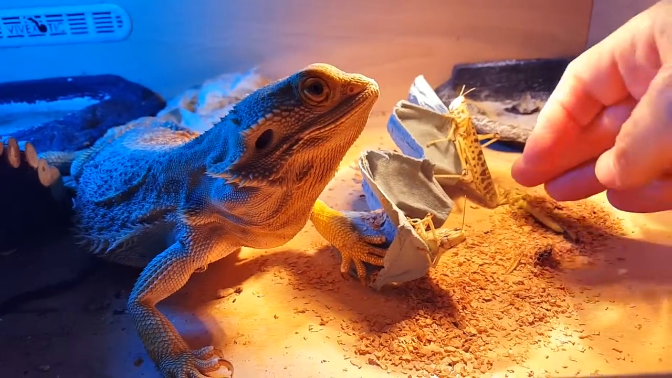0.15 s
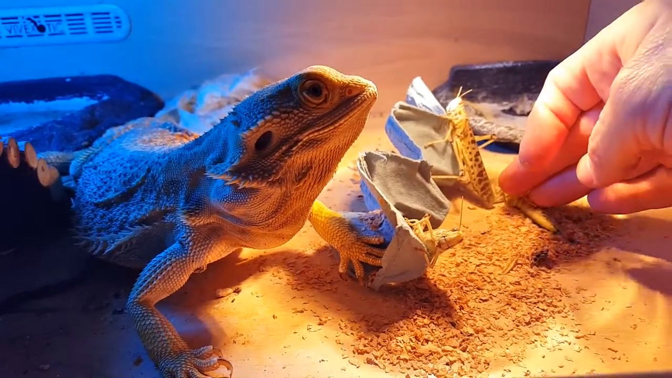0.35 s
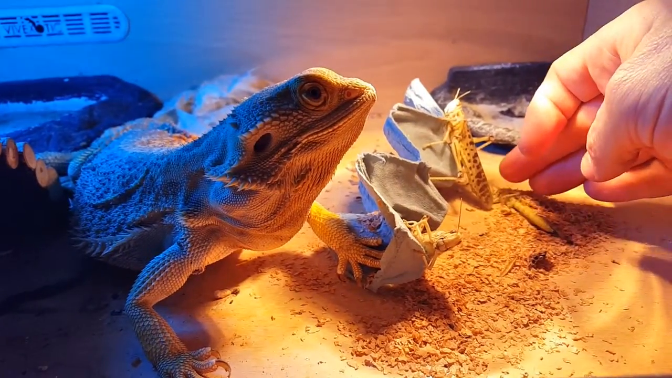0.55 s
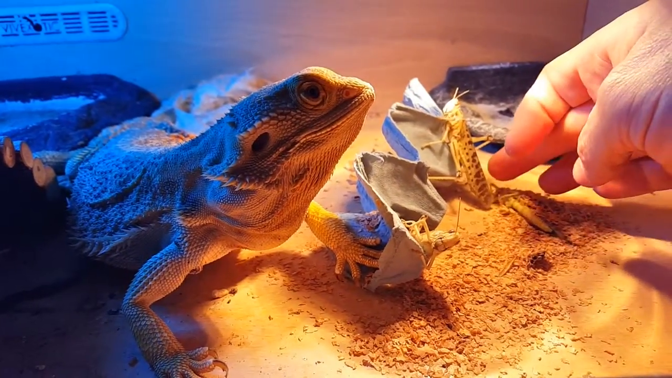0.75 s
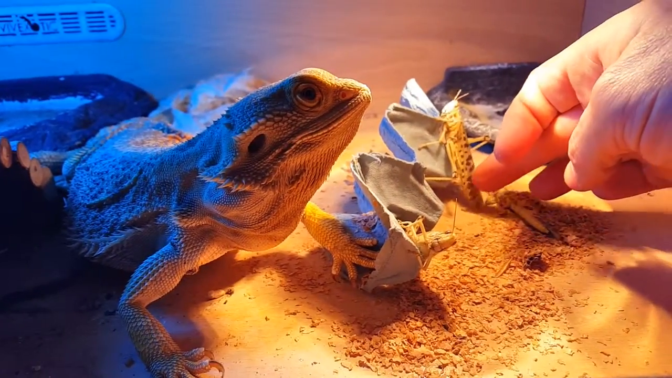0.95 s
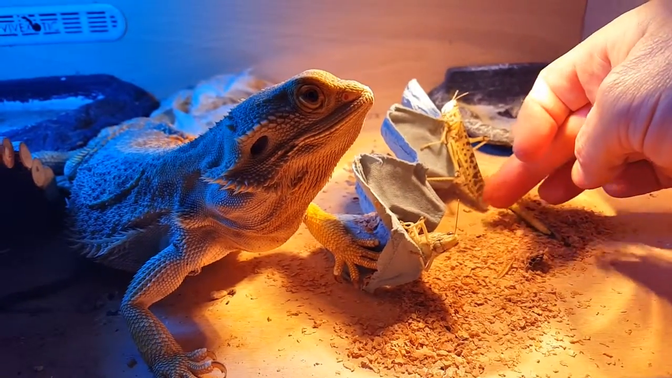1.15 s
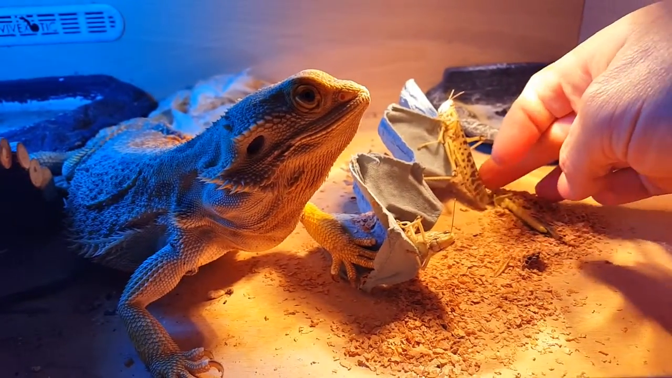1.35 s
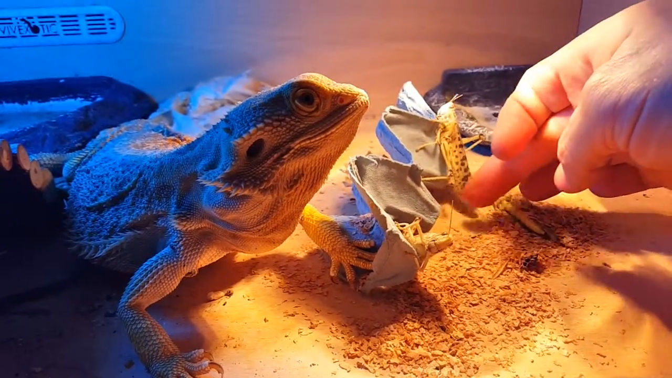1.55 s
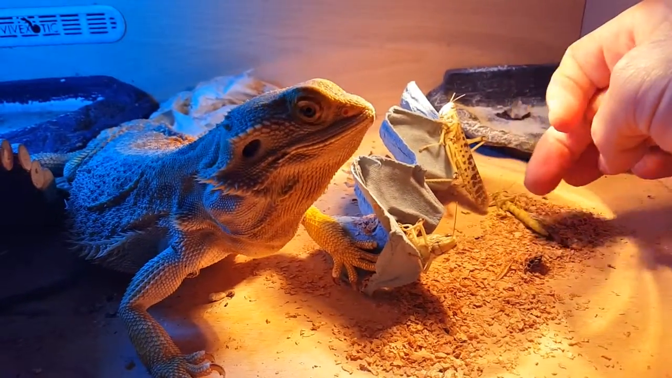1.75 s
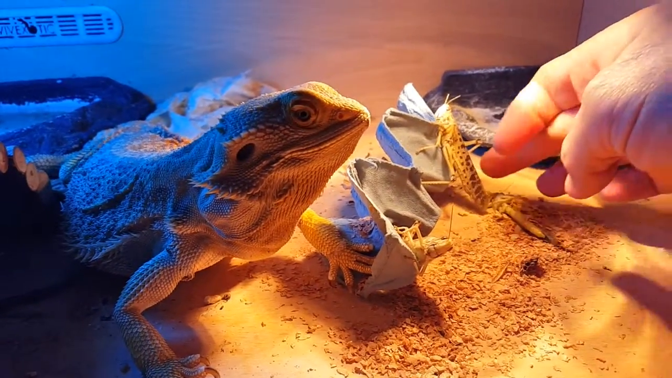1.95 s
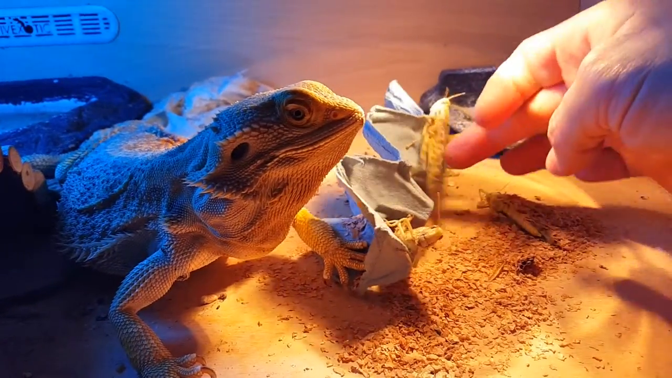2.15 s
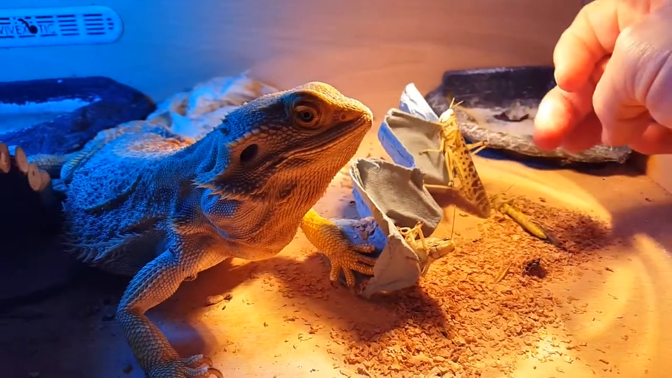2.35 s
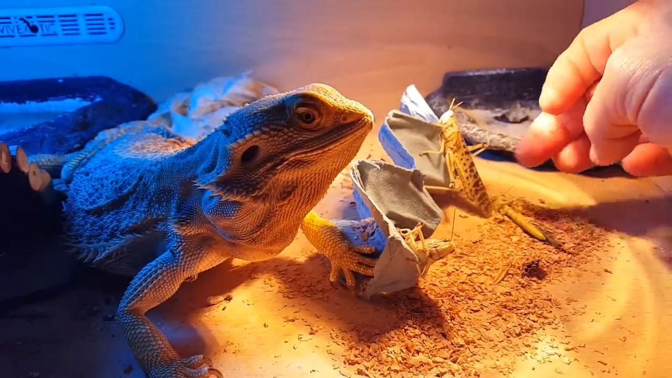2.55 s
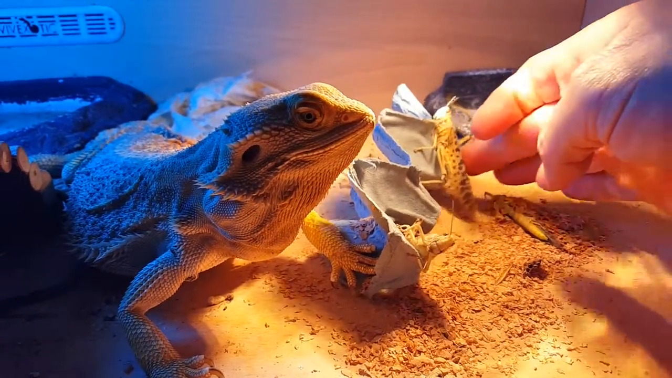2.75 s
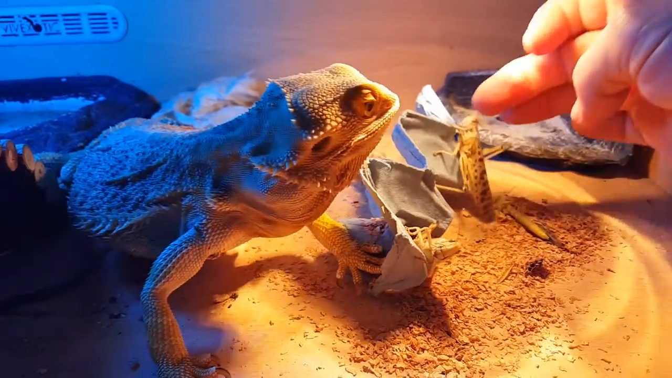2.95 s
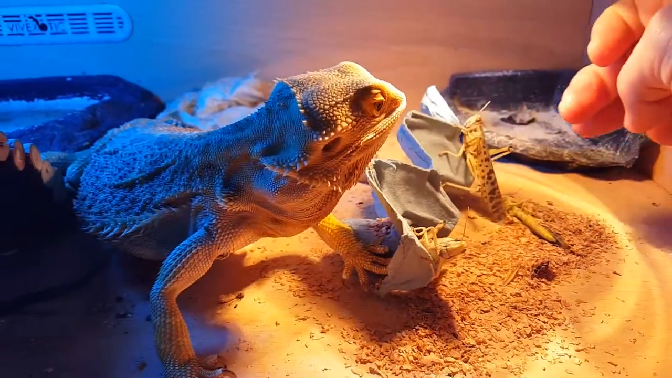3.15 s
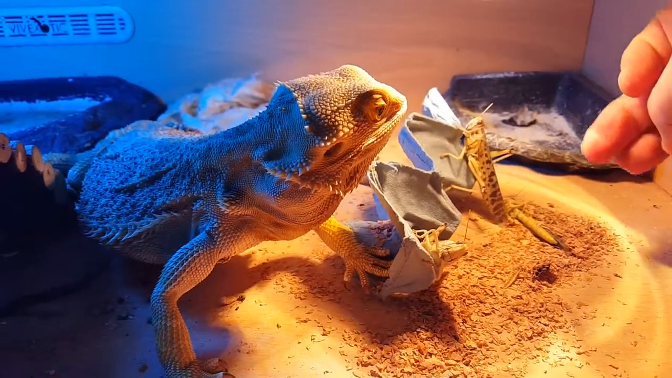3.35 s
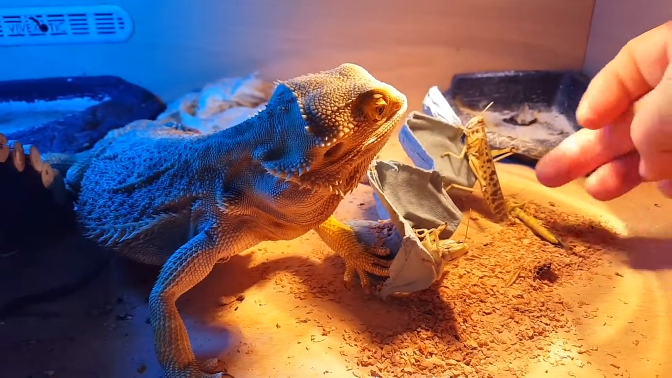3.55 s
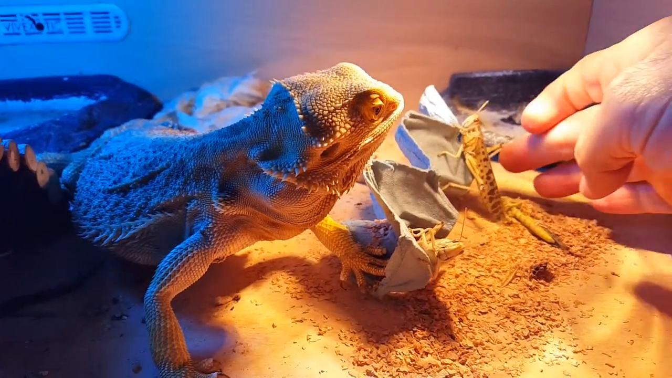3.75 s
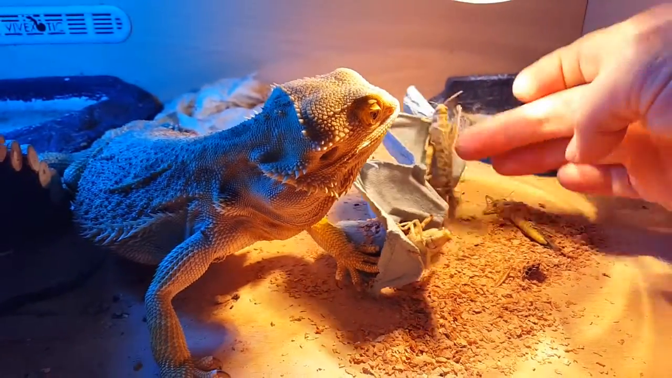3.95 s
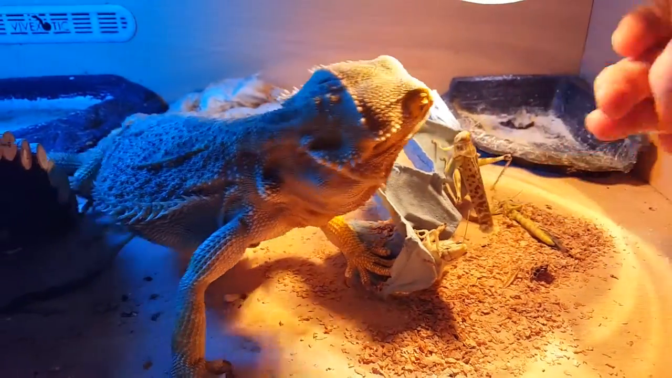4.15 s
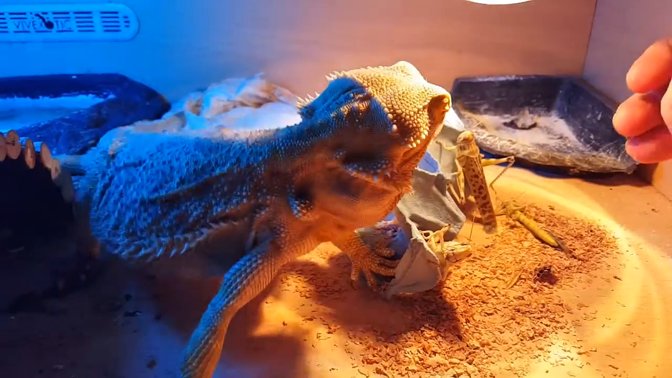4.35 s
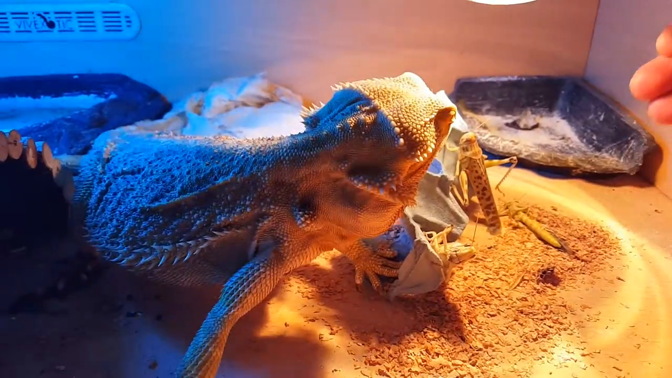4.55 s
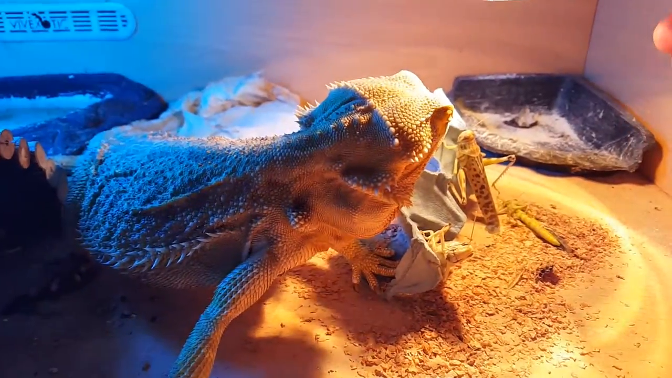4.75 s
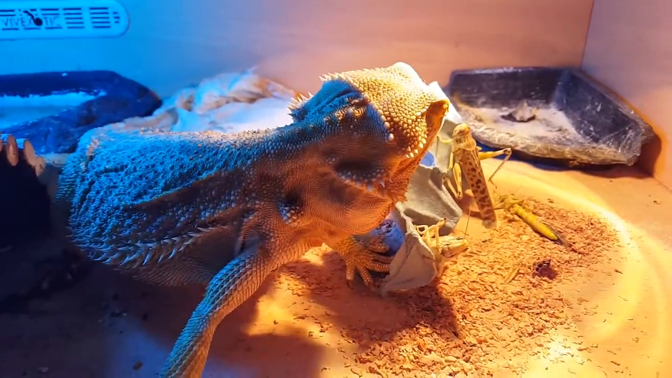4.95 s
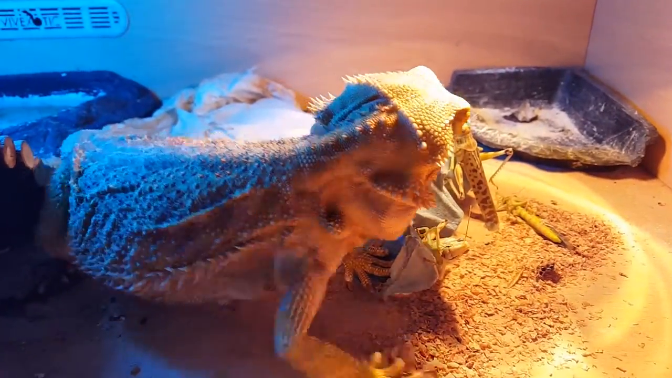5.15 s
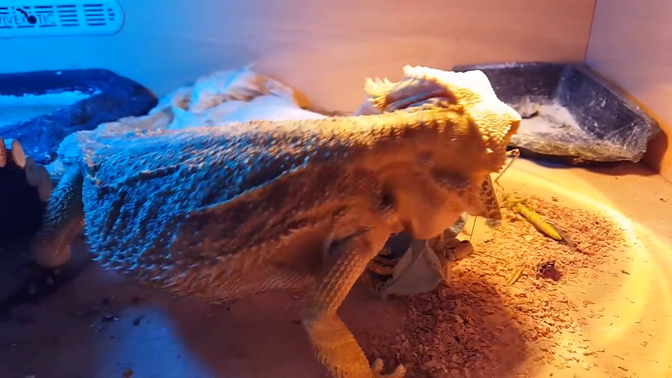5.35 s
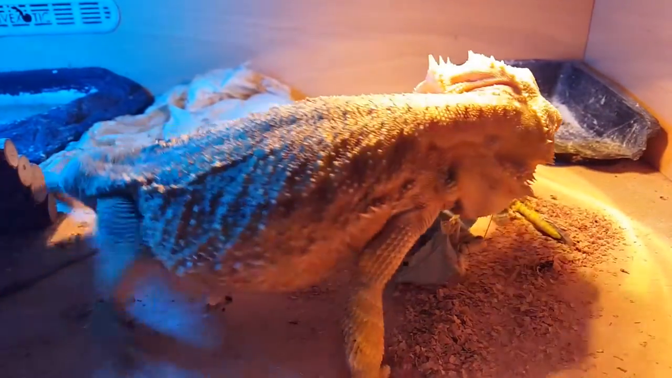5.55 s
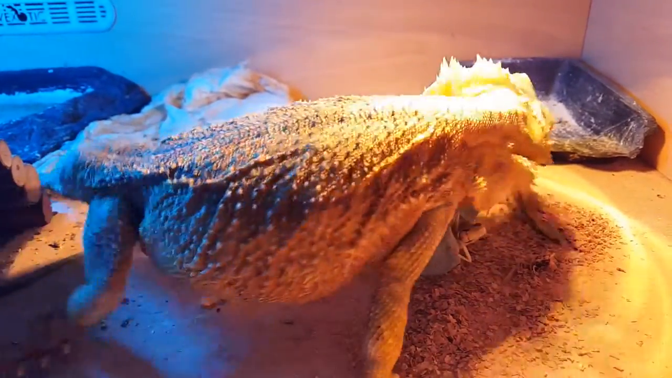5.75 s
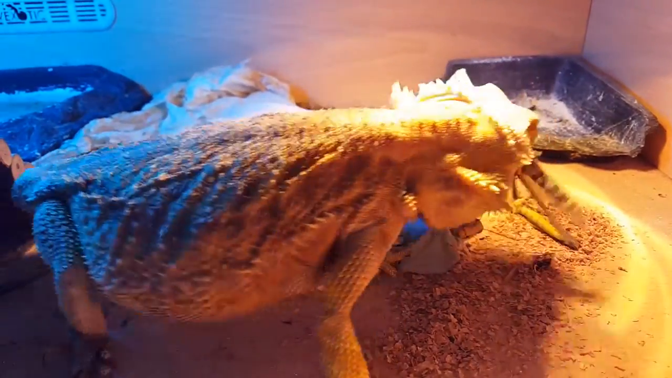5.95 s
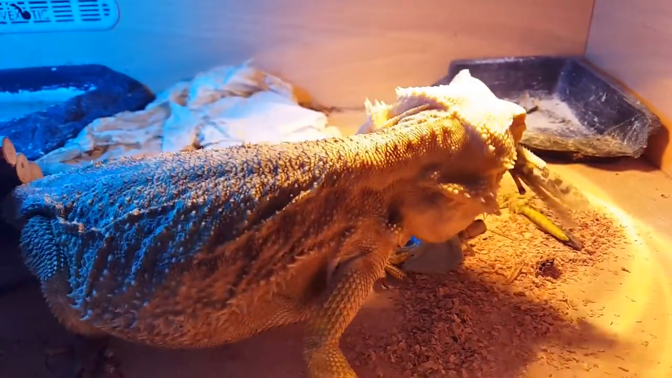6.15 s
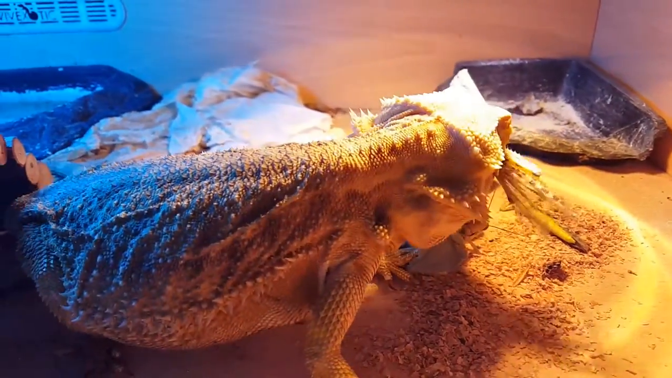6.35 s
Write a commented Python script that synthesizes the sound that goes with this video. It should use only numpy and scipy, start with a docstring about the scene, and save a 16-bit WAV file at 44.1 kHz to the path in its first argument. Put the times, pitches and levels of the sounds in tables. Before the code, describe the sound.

Woody knocks on a small enclosure, faint papery leaf rustles, a sharp snap, then a lizard scrabbles forward and crunches a brittle insect.

```python
"""A low hum, soft rubbing and a rumbling floor are heard first; from 0.4 s knocks excite a wooden vivarium.
Fingers nudge a locust over dry leaves (grains that ring); the bearded lizard then scrabbles and crunches it.
Snaps are runs of tiny touches, feet excite the modes of the hollow floor, and rubbing is filtered noise.
Decaying noise gives wall echoes and the room's tail; still air and a wavering hum lie underneath."""
import sys
import numpy as np
from scipy import signal
from scipy.fft import rfft, irfft, next_fast_len
from scipy.io import wavfile
from scipy.ndimage import uniform_filter1d

SR = 44100
rng = np.random.default_rng(int(sys.argv[2]) if len(sys.argv) > 2 else 0)


def transcribe(u):
    """Save the signal u as a 16-bit wav file named by the first command-line argument.

    u: samples, shape (n,) or (channels, n), limited to [-1, 1]; the rate is SR.
    q: integer samples, one column per channel.
    """
    v = np.clip(np.atleast_2d(u).T, -1, 1)
    q = np.round(v * 32767).astype(np.int16)
    wavfile.write(sys.argv[1], SR, q)


N = 282240
TIME = np.arange(N) / SR
GRAZE_S = .005  # surfaces graze each other this long before the main touch


# Knocks on the enclosure and, from 2.9 s, knocks of the lizard's feet:
# (time [s], relative level [dB], relative treble [dB],
# left over right [dB], ring frequency [Hz], ring energy over knock [dB])
KNOCKS = [(0.4035, -19, -23.5, 10, 870, -7), (0.4111, -13, -25, 9, 2260, -6),
          (0.473, -23.5, -30.5, 8, 1980, -10), (0.553, -14.5, -28, 5, 1300, -6),
          (0.5568, -16.5, -38, 10.5, 1930, -6), (0.6468, -7, -11.5, 10.5, 1340, -6),
          (0.656, -13, -10, -1.5, 1923, -4), (0.722, -23, -14, 5, 345, -5), (0.7419, -27.5, -15, 7, 368, 0),
          (0.8504, -26, -25.5, 6.5, 1340, -1), (2.9568, -25.5, -36, 13, 1340, 6),
          (5.0661, -16.5, -3.5, 4, 835, 12), (5.085, -23, -43, 6, 560, 15),
          (5.3352, -24, -14, 6.5, 790, -0.5)]
# Spectrum of a knock: (frequency [Hz], relative level per Hz [dB])
KNOCK_COLOUR = [(80, -30.5), (250, 0.5), (600, -3), (900, -0.5), (1400, -4.5), (2300, 5), (3400, -1.5),
                (4800, -16.5), (8000, -17), (11000, -28), (16000, -39)]


def knocks(level_db=11, treble_db=24, ring_width_hz=200):
    """Impact excitation: each knock adds a short damped resonance and wakes the room."""
    out = np.zeros((2, N))
    for s, db, bright_db, pan_db, ring_hz, ring_db in KNOCKS:
        touch = contact(.012, rattle_db=-8)
        bright = brighten(touch, bright_db + treble_db, low_hz=2900, high_hz=4630)
        knock = ringing(colour(bright, KNOCK_COLOUR), ring_hz, ring_width_hz, ring_db)
        heard = vivarium(knock, echo_db=2, echo_t60=0.047, room_db=-7.5, room_t60=0.35)
        add(out, s - GRAZE_S, from_db(db + level_db) * pan(pan_db) * heard)
    return out


# Bites in short strokes: (time [s], length [s], relative level [dB])
BITES = [(5.77, 0.015, -35.5), (5.803, 0.015, -42), (5.843, 0.03, -33.5), (5.945, 0.043, -38),
         (6.036, 0.02, -45), (6.112, 0.023, -45), (6.193, 0.018, -47.5)]
BITE_ATTACK_S, BITE_RELEASE_S = 0.0032, 0.19
# Spectrum of crunch and rasp: (frequency [Hz], relative level per Hz [dB])
CRUNCH_COLOUR = [(100, -16), (300, -24.5), (600, -10), (1100, -11.5), (1750, -7.5), (2200, -4), (3200, -7),
                 (4300, -13), (6000, -11), (7500, -17.5), (12000, -17), (16000, -28)]


def crunch(biting, level_db=-1, shell_hz=2700):
    """Brittle fracture: jaws crush the shell into sparse, coarse, uneven grains."""
    grains = crackle(biting, CRUNCH_COLOUR, shell_hz, grains_per_s=700,
                     spread_db=4.5, clump_db=1.5, pan_db=4.5)
    return from_db(level_db) * grains


# Snaps of dry leaf, grit and insect shell:
# (time [s], relative level [dB], relative treble [dB], ring frequency [Hz])
SNAPS = [(1.0088, -33.5, -35, 2770), (1.0268, -37.5, -27, 1700), (1.5291, -30, -18, 1580),
         (1.603, -37, -3, 1600), (2.2171, -26, -22, 2900), (2.852, -26, -21, 3130),
         (2.891, -26.5, -17, 2820), (2.943, -26, -13, 1310), (2.9633, -21, -17, 1340),
         (3.071, -27.5, -35, 1600), (3.989, -27, -21, 3000), (4.0085, -27.5, -2, 4400),
         (4.064, -32, -29, 3000), (4.2148, -35, -15, 7100), (4.297, -35.5, 10, 7300),
         (4.367, -14.5, -5.5, 3350), (5.0348, -25, 4, 1970), (5.1562, -26.5, -21, 3150),
         (5.54, -13, 10, 3460), (5.623, -13, 6, 2600), (5.7173, -17, -20, 2100), (5.723, -11.5, -20, 2600),
         (5.7809, -14, -31, 2090), (5.8172, -14.5, -29, 2270), (5.8419, -9.5, -12.5, 2090),
         (5.868, -15.5, -20, 2100), (5.9182, -19, -20, 3000), (5.9461, -14, -14.5, 2060),
         (5.965, -17, -18, 2950), (5.992, -17.5, -22, 2040), (6.118, -23, -17, 1720), (6.242, -27, 4, 9960),
         (6.332, -31.5, -1, 4430)]
# Spectrum of a snap: (frequency [Hz], relative level per Hz [dB])
SNAP_COLOUR = [(100, -32), (300, -15.5), (800, -8.5), (1200, -12.5), (1600, -7), (2400, -5.5), (3500, -8),
               (5000, -11), (8000, -16.5), (16000, -21.5)]


def snaps(level_db=9.5, treble_db=11, ring_width_hz=550, ring_db=-3):
    """Brittle failure: a quick run of cracks rings each piece briefly at its own pitch."""
    out = np.zeros((2, N))
    for s, db, bright_db, ring_hz in SNAPS:
        run = contact(.012, rattle_db=-2)
        bright = brighten(run, bright_db + treble_db)
        crack = ringing(colour(bright, SNAP_COLOUR), ring_hz, ring_width_hz, ring_db)
        heard = vivarium(crack, echo_db=2, echo_t60=0.038, room_db=-7, room_t60=0.28)
        add(out, s - GRAZE_S, from_db(db + level_db) * heard)
    return pan(6.6) * out


# The lizard scrabbles forward:
# (time [s], length [s], relative level [dB], ring frequency of the bedding [Hz])
SCRABBLES = [(5.2, 0.26, -50.5, 2900), (5.452, 0.065, -35.5, 2160), (5.523, 0.03, -33, 2460),
             (5.565, 0.17, -31.5, 2180)]
SCRABBLE_ATTACK_S, SCRABBLE_RELEASE_S = 0.0054, 0.14


def rasp(scrabbling, level_db=-1.47):
    """Granular friction: claws drag through the bedding in dense, fine grains."""
    grains = crackle(scrabbling, CRUNCH_COLOUR, ring_pitch(SCRABBLES), grains_per_s=4000,
                     spread_db=2.5, clump_db=0.3, pan_db=6.0)
    return from_db(level_db) * grains


# Fingers push the insect over dry leaves:
# (time [s], length [s], relative level [dB], ring frequency of the leaves [Hz])
PUSHES = [(0.975, 0.032, -53.5, 2800), (1.525, 0.07, -56.5, 2610), (2.11, 0.086, -52.5, 2180),
          (2.205, 0.02, -46, 2700), (2.735, 0.045, -52, 2410), (2.768, 0.052, -43, 3980),
          (2.875, 0.042, -43.5, 2230), (2.955, 0.06, -37.5, 2700), (3.97, 0.02, -44, 3170),
          (4.03, 0.069, -56.5, 3960), (4.31, 0.047, -51.5, 1460), (4.37, 0.072, -48.5, 1690)]
PUSH_ATTACK_S, PUSH_RELEASE_S = .02, .17
# Spectrum of dry leaves: (frequency [Hz], relative level per Hz [dB])
LEAF_COLOUR = [(100, -5), (300, -14), (600, 0.5), (950, -12), (1400, -2.5), (3100, -1.5), (4800, -8.5),
               (8000, -13), (13000, -14.5), (16000, -25)]


def leaves(pushing, level_db=-1.5):
    """Granular friction: dense small grains make a light, papery rustle under the fingers."""
    grains = crackle(pushing, LEAF_COLOUR, ring_pitch(PUSHES), grains_per_s=3700,
                     spread_db=3.5, clump_db=2.0, pan_db=5.5)
    return from_db(level_db) * grains


# A claw squeaks on the smooth floor: (start [s], end [s], frequency [Hz])
SQUEAK = (4.215, 4.305, 7000)


def squeak(level_db=-62, width_hz=250):
    """Frictional excitation of one resonance: narrow-band noise is a thin, rough whistle."""
    start, end, hz = SQUEAK
    whistle = rms_one(resonate(rng.standard_normal(N), [(hz, width_hz, 0)]))
    sliding = 1. * ((TIME > start) & (TIME < end))
    return pan(2.0) * from_db(level_db) * whistle * uniform_filter1d(sliding, size=300)


# Blows that reach the hollow floor:
# (time [s], peak level before panning [dB], frequency at which the struck spot gives most [Hz])
THUMPS = [(0.555, -33.5, 272), (0.65, -34, 210), (2.215, -39, 210), (2.97, -32.5, 228), (4.368, -31.5, 116),
          (5.076, -42, 55), (5.627, -30.5, 204), (5.882, -35, 247)]
# Resonances of the wooden floor: (frequency [Hz], width [Hz], relative level [dB])
FLOOR_MODES = [(109.7, 2.9, 3.5), (147.1, 13, 3.5), (210, 29, -5), (243.3, 13.5, 9), (365, 90, -21),
               (527.6, 42, -8), (770, 77, -19)]


def thumps(level_db=0, spot_width=0.87, flex_db=-14):
    """Modal excitation: blows and footfalls make the floor boom, and each spot favours other modes."""
    out = np.zeros(N)
    for s, db, hz in THUMPS:
        spot = [(hz, spot_width * hz, 0)]
        touch = np.pad(contact(.05, rattle_db=-5), (0, SR // 3))  # room for the boom to decay
        push = resonate(resonate(touch, spot), spot)
        boom = resonate(push, FLOOR_MODES) + from_db(flex_db) * push
        add(out, s - GRAZE_S, from_db(db + level_db) * boom / np.abs(boom).max())
    return pan(1.0) * out


# A dragged foot judders on the floor: (time [s], length [s], level [dB])
JUDDER = [(5.086, 0.039, -31)]


def judder(slip_hz=250, wander=0.058):
    """Stick-slip: the foot slips at a wandering rate close to the floor's strongest resonance."""
    turns = np.cumsum(slip_hz * (1 + wander * drift(90))) / SR
    slips = np.diff(np.floor(turns), prepend=0)  # one impulse per turn
    boom = rms_one(resonate(slips, FLOOR_MODES))
    return boom * effort(JUDDER, attack_s=0.011, release_s=0.19)


# Slow moves of hand and body rub skin and sleeve: (time [s], length [s], relative level [dB])
RUBS = [(-0.08, 0.38, -53.5), (0.4, 0.5, -59.5), (1.36, 0.057, -61.5), (1.5, 0.44, -66), (3.1, 0.28, -65),
        (3.35, 0.063, -59), (3.71, 0.56, -59), (4.2, 0.21, -50.5), (4.57, 1.675, -53)]
RUB_ATTACK_S, RUB_RELEASE_S = 0.049, 0.78
# Spectrum of the swish: (frequency [Hz], relative level per Hz [dB])
SWISH_COLOUR = [(100, 0.5), (300, -0.5), (900, 0), (1800, -0.5), (3000, -4), (5000, -17), (8000, -20),
                (16000, -20.5)]
# Skin slides smoothly: (time [s], length [s], relative level [dB])
SLIDES = [(0.03, 0.21, -75), (1.565, 0.036, -60), (4.66, 0.198, -60.5), (4.955, 0.2, -59.5)]
# Spectrum of the fine hiss: (frequency [Hz], relative level per Hz [dB])
SLIDE_COLOUR = [(2000, -22), (6000, -8), (9000, -6), (11600, 3), (13400, -4), (16000, -10)]


def rubbing(swish_db=1, flutter_db=1.5):
    """Soft friction: many unresolved contacts act as coloured noise, a fluttering swish and a fine hiss."""
    swish = colour(two_ears(rng.standard_normal((2, N))), SWISH_COLOUR)
    swish = swish * effort(RUBS, RUB_ATTACK_S, RUB_RELEASE_S) * from_db(swish_db + flutter_db * drift(60))
    hiss = colour(rng.standard_normal((2, N)), SLIDE_COLOUR)
    hiss = hiss * effort(SLIDES, attack_s=0.048, release_s=0.038)
    return pan(3.7) * swish + pan(17.2) * hiss


# Shifts of weight load the floor: (time [s], length [s], relative level [dB])
SHIFTS = [(0.08, 0.098, -46.5), (0.28, 0.16, -46), (0.71, 0.067, -57), (3.97, 0.077, -55),
          (4.37, 0.015, -41), (4.68, .12, -47.5), (4.84, 0.024, -44), (5.025, 0.1, -38.5),
          (5.205, 0.014, -46.5), (6.21, 0.019, -52.5)]


def rumble(pushing, scrabbling, shift_db=-1, push_db=-11, scrabble_db=-15, rub_db=-6):
    """Forced vibration: whatever drags over the hollow floor drives its modes, shifting weight most of all."""
    load = (from_db(shift_db) * effort(SHIFTS, attack_s=0.0092, release_s=0.32),
            from_db(push_db) * pushing,
            from_db(scrabble_db) * scrabbling,
            from_db(rub_db) * effort(RUBS, RUB_ATTACK_S, RUB_RELEASE_S))
    boom = resonate(two_ears(rng.standard_normal((2, N)), alike_hz=1600), FLOOR_MODES)
    boom /= np.sqrt(uniform_filter1d(np.mean(boom ** 2, axis=0), size=2000))  # steady pressure keeps it even
    return pan(0.94) * boom * np.linalg.norm(load, axis=0)  # loads add in power


# Spectrum of still room air: (frequency [Hz], relative level per Hz [dB])
AIR = [(25, -5.5), (52, -3), (105, -8.5), (190, -6), (256, -9.5), (350, -13.5), (500, -7), (680, -20.5),
       (1000, -18.5), (4000, -28.5), (16000, -42)]
# A low hum that comes and goes: (time [s], level [dB])
HUM = [(0, -53), (.7, -65), (1.25, -58), (1.45, -77), (6.4, -76)]


def background(air_db=-63, hum_hz=101.4):
    """Broadband and narrow-band noise: still room air, and a hum that wavers within a 5 Hz band."""
    air = from_db(air_db) * colour(two_ears(rng.standard_normal((2, N))), AIR)
    hum = rms_one(resonate(rng.standard_normal(N), [(hum_hz, 5, 0)]))
    return air + hum * from_db(in_time(HUM)[0])


def crackle(force, spectrum, ring_hz, grains_per_s, spread_db, clump_db, pan_db, count=4):
    """Granular emission: dry matter gives way in clumps of clicks that ring, from spots with their own echoes."""
    sizes = from_db(spread_db * np.minimum(rng.exponential(1, N), 4)) * rng.choice([-1, 1], N)
    grains = sizes * (rng.random(N) < grains_per_s / SR) * from_db(clump_db * drift(220))
    # the force sets how much gives way
    grains *= force / np.sqrt(uniform_filter1d(grains ** 2, size=800) + 1e-6)
    # each grain rings the piece nearest to the wandering pitch
    pitches, wander, width, ring_gain = np.geomspace(1200, 5500, 18), .14, .16, 1.5
    borders = np.sqrt(pitches[1:] * pitches[:-1])
    piece = np.searchsorted(borders, ring_hz * np.exp(wander * drift(60)))
    rings = sum(resonate(grains * (piece == k), [(hz, width * hz, 0)]) for k, hz in enumerate(pitches))
    grains = grains + ring_gain * rings
    spot = np.argmax([drift(70) for _ in range(count)], axis=0)  # the spot that gives way keeps changing
    heard = sum(vivarium(grains * (spot == k), echo_db=1.5, echo_t60=0.036, room_db=-12.5, room_t60=0.6)
                for k in range(count))
    return pan(pan_db) * colour(heard, spectrum)


def contact(length_s, rattle_db):
    """Rough contact: a sharp main touch among tiny ones that lead up to it and follow it; energy 1."""
    t = TIME[:SR // 10] - GRAZE_S
    swell = from_db(-60 * np.maximum(t / length_s, -t / GRAZE_S))
    touches = from_db(rattle_db) * energy_one(rng.standard_normal(len(t)) * swell)
    touches[round(GRAZE_S * SR)] = 1
    return energy_one(touches)


def effort(moves, attack_s, release_s):
    """Envelope: moves rise linearly, fall 60 dB per release once their length is over, and add in power."""
    power = np.zeros(N)
    for s, length_s, db, *_ in moves:
        rise = np.clip((TIME - s) / attack_s, 0, 1)
        fall = from_db(-60 * np.clip((TIME - s - length_s) / release_s, 0, 2))
        power += (from_db(db) * rise * fall) ** 2
    return np.sqrt(power)


def ringing(hit, hz, width_hz, db):
    """Damped resonance: a hit and the short ring of the struck piece; energy 1."""
    ring = energy_one(resonate(hit, [(hz, width_hz, 0)]))
    return energy_one(energy_one(hit) + from_db(db) * ring)


def ring_pitch(moves):
    """Pitch glide: the ring moves from the middle of one move to the middle of the next."""
    return in_time([(s + length_s / 2, hz) for s, length_s, _, hz in moves])[0]


def brighten(x, db, low_hz=3200, high_hz=6000):
    """Contact stiffness: a harder contact has more treble."""
    return colour(x, [(low_hz, 0), (high_hz, db)])


def resonate(x, modes):
    """Modal superposition: two-pole resonances in parallel."""
    out = 0
    for hz, width, db in modes:
        r = np.exp(-np.pi * width / SR)
        poles = [1, -2 * r * np.cos(2 * np.pi * hz / SR), r * r]
        gain = from_db(db) * (1 - r * r) / 2
        out = out + gain * signal.lfilter([1, 0, -1], poles, x + 1e-18)
    return out


def colour(x, points):
    """Minimum-phase (causal) filtering through the points of a spectrum; white noise keeps its power."""
    size = next_fast_len(x.shape[-1] // 2 + 4096) * 2
    hz, db = np.transpose(points)
    grid = np.log(np.linspace(1, SR / 2, size // 2 + 1))
    gain = rms_one(from_db(np.interp(grid, np.log(hz), db)))
    cepstrum = irfft(np.log(gain))
    cepstrum[1:size // 2] *= 2  # folding the cepstrum forward makes the filter causal
    cepstrum[size // 2 + 1:] = 0
    return irfft(rfft(x, size) * np.exp(rfft(cepstrum)))[..., :x.shape[-1]]


# Resonances of the walls: (frequency [Hz], width [Hz], relative level [dB])
WALL_MODES = [(1300, 60, 9), (1530, 150, 1.5), (2090, 140, -3), (2390, 36, -14.5), (2800, 1200, -13),
              (3200, 81, -8.5), (6200, 85, -12.5)]


def vivarium(x, echo_db, echo_t60, room_db, room_t60):
    """Reverberation: direct sound, quick echoes between ringing walls and a room tail, new for each spot."""
    echoes = from_db(echo_db) * two_ears(dying_noise(echo_t60))
    tail = colour(two_ears(dying_noise(room_t60)), [(6500, -1.5), (10000, -2), (15000, -7)])
    response = echoes + from_db(room_db) * tail
    response = np.pad(response, ((0, 0), (20, 0)))  # echoes follow the direct sound
    response[0, 0] += 1
    response[1, 9] += .6  # the far port hears it later and weaker
    response = energy_one(response)
    response = response + resonate(response, WALL_MODES)
    return signal.oaconvolve(np.atleast_2d(x), response, axes=1)[:, :N]


def dying_noise(t60, channels=2):
    """Exponential decay: half a second of noise that falls 60 dB in t60 seconds; energy 1."""
    return energy_one(rng.standard_normal((channels, SR // 2)) * from_db(-60 * TIME[:SR // 2] / t60))


def two_ears(x, alike_hz=650):
    """Spatial coherence: channels are alike in the bass, where waves exceed the microphone spacing."""
    side = signal.sosfilt(signal.butter(1, alike_hz, "high", fs=SR, output="sos"), x[1])
    return (x[0] + side * np.array([[1], [-1]])) / np.sqrt(2)


# The right microphone port faces away and loses treble: (frequency [Hz], relative level [dB])
FAR_PORT = [(300, 3), (700, 5), (1300, -1), (2400, -3.5), (4200, 3), (6000, -0.5), (8200, -12),
            (15000, -5.5)]


def shade_far_port(x, level_db=-2.0):
    """Acoustic shadow: the case shades the right port from the sounds in the vivarium."""
    return np.stack([x[0], from_db(level_db) * colour(x[1], FAR_PORT)])


def pan(db):
    """Level difference: left and right gains, db apart."""
    return from_db(np.array([[.5], [-.5]]) * db)


def drift(rate):
    """Slow random variation: chance knots, rate per second, joined by lines; spread 1."""
    knots = rng.standard_normal(2 * N // 100)
    return rms_one(np.interp(TIME * rate, np.arange(len(knots)), knots))


def in_time(rows):
    """Linear interpolation: each column of a curve at every sample."""
    s, *columns = np.transpose(rows)
    return [np.interp(TIME, s, c) for c in columns]


def add(track, s, sound):
    """Superposition: mix a sound in at its moment."""
    start = max(round(s * SR), 0)
    track[..., start:start + sound.shape[-1]] += sound[..., :N - start]


def from_db(db):
    """Decibel law: level to amplitude."""
    return 10 ** (np.asarray(db) / 20)


def rms_one(x):
    """Power normalisation: effective value 1."""
    return x / np.sqrt(np.mean(x ** 2) + 1e-20)


def energy_one(x):
    """Energy normalisation: each channel has energy 1."""
    return x / np.sqrt(np.sum(x ** 2, axis=-1, keepdims=True) + 1e-20)


def scene():
    """Superposition of sources: fingers and lizard work on dry matter and on the floor beneath it."""
    pushing = effort(PUSHES, PUSH_ATTACK_S, PUSH_RELEASE_S)
    scrabbling = effort(SCRABBLES, SCRABBLE_ATTACK_S, SCRABBLE_RELEASE_S)
    biting = effort(BITES, BITE_ATTACK_S, BITE_RELEASE_S)
    brittle = knocks() + crunch(biting) + snaps() + rasp(scrabbling) + leaves(pushing) + squeak()
    floor = thumps() + judder() + rumble(pushing, scrabbling + biting)
    return shade_far_port(brittle + rubbing()) + floor + background()


def record(dry, low_cut_hz=36, cutoff_hz=16200):
    """Band limiting and soft saturation: deepest bass is cut, peaks are rounded, the top is cut steeply."""
    heard = signal.sosfilt(signal.butter(2, low_cut_hz, "high", fs=SR, output="sos"), dry)
    rounded = .8 * np.tanh(heard / .8)
    return signal.sosfilt(signal.ellip(10, .1, 80, cutoff_hz, fs=SR, output="sos"), rounded)


dry = scene()
out = record(dry)
transcribe(out)
```